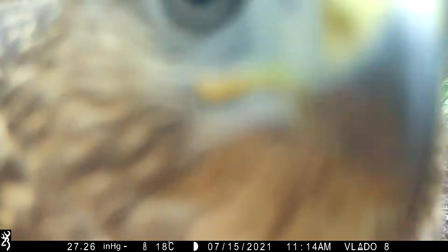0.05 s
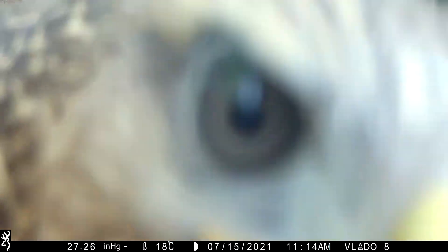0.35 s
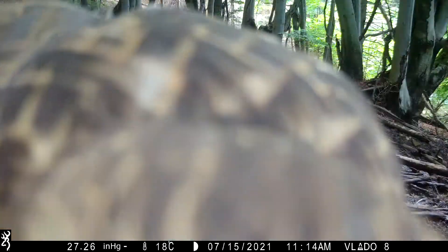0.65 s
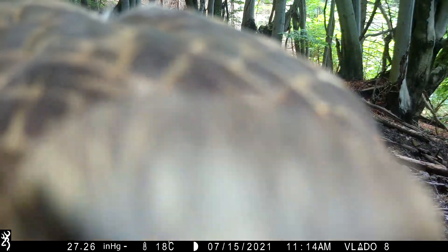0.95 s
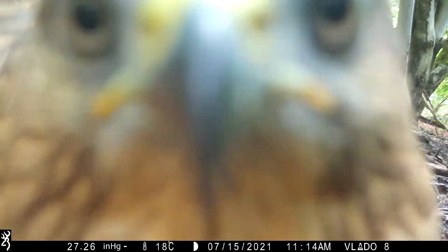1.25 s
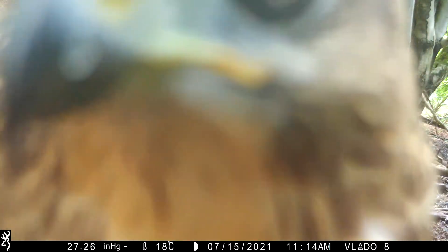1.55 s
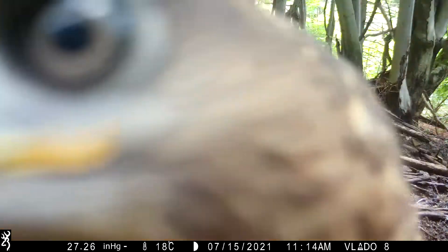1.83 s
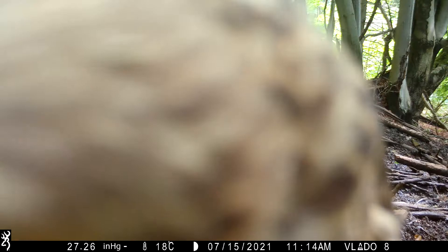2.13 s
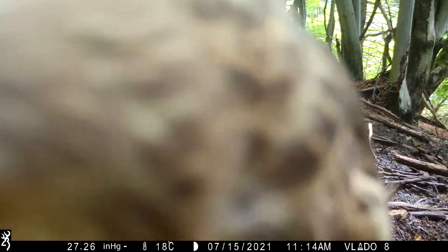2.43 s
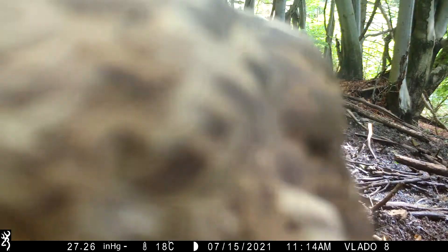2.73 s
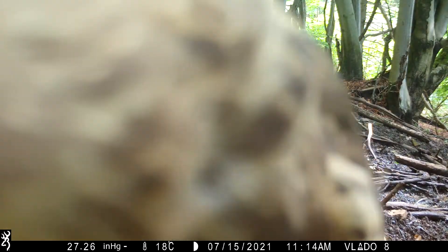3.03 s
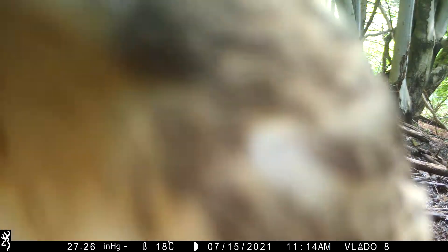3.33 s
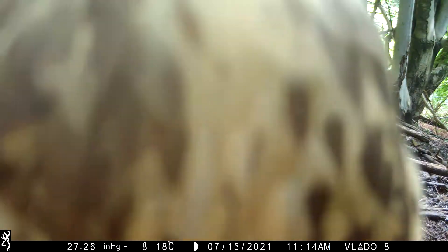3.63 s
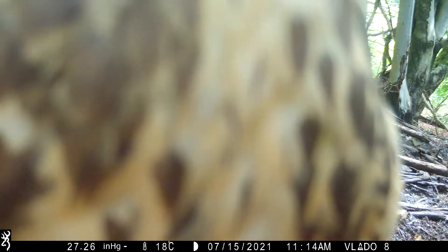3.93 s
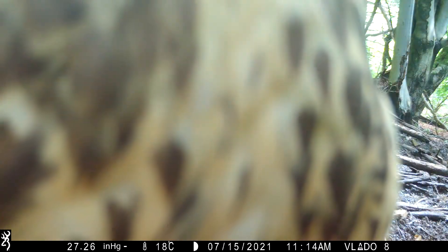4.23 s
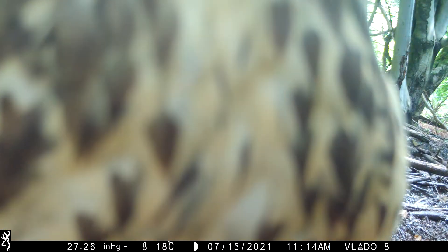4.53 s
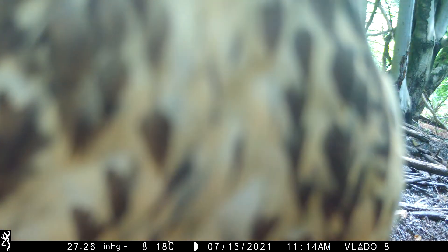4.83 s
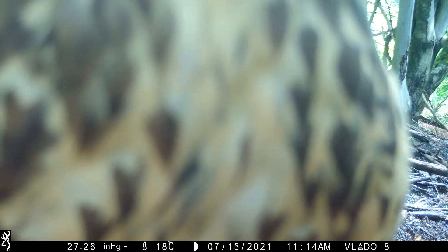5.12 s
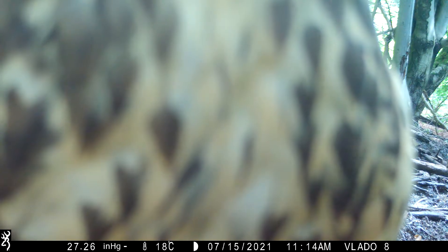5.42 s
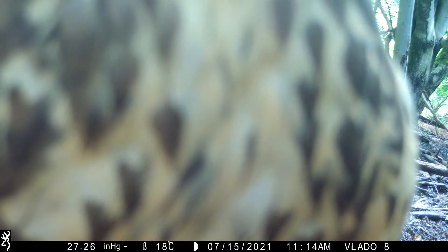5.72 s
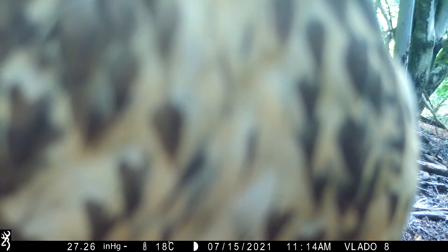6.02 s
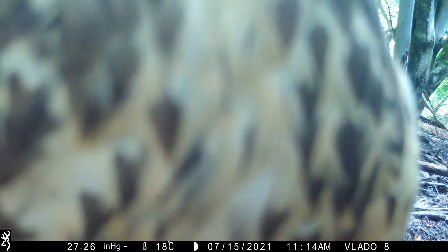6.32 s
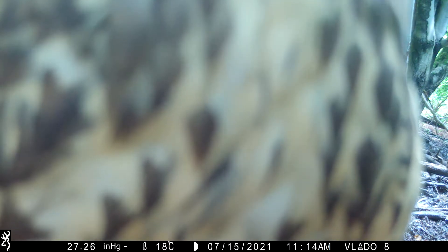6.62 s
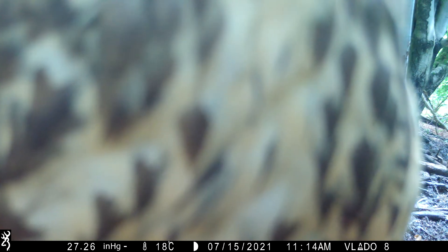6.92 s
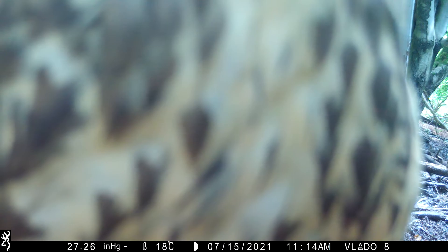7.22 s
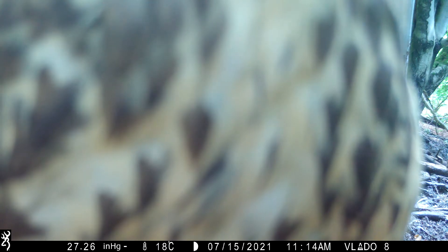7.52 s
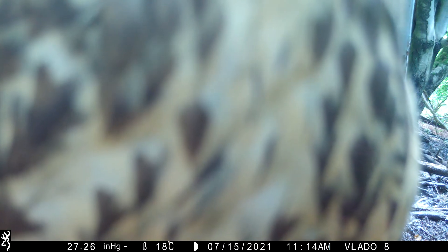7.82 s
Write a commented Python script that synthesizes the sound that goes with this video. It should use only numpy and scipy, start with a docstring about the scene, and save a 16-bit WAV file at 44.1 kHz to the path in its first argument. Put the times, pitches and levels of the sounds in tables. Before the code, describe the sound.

A bird of prey pecks at a trail camera in a quiet wood, heard through the camera's own microphone. A few sharp, very close knocks ring the plastic case just before one second. After a pause comes a busier second of taps and short beak scrapes, the hardest with a dry crackle and a slight thump. From about three seconds on, only a soft, dull hiss remains.

```python
"""Bird of prey at a trail camera

A quiet wood, heard from the camera's own microphone. The bird pecks, then knocks and drags its beak
over the case. Every contact rings the plastic housing right at the microphone; the hardest ones shove
the camera on its mount. A faint whistle sounds far off, behind the camera's hiss and thin whine."""
import sys
import numpy as np
from scipy import signal
from scipy.fft import rfft, irfft, next_fast_len
from scipy.io import wavfile

SR = 44100
rng = np.random.default_rng(int(sys.argv[2]) if len(sys.argv) > 2 else 0)


def generate_wav(signal):
    """Clip the signal to [-1, 1] and save it as 16-bit WAV at the path in sys.argv[1]."""
    frames = np.transpose(np.atleast_2d(signal))
    scaled = np.clip(frames, -1, 1) * 32767
    pcm = np.round(scaled).astype(np.int16)
    wavfile.write(sys.argv[1], SR, pcm)


N = 351036

# Pecks on the case, right at the microphone. Each row: start in seconds, level, brightness, body
# and crackle in relative dB, delay of the rebound in seconds (0 for none).
PECKS = [(.7089, -11.5, -8, 3, -29.5, 0), (.752, -35, -5, 11, -28, 0.00071),
         (.7653, -7.5, -1.5, -2.5, -12.5, .0036), (2.1207, -9, 1, -4, -19.5, 0.0088),
         (2.1789, -10.5, -1.5, 6.5, -18.5, 0), (2.1921, -15, 4.5, -6.5, -31, 0.00033),
         (2.21, -17, 5.5, -7, -19, 0.00027), (2.2568, -42, -4.5, -4, -32, 0.00039),
         (2.539, -38, 5, -7, -36, 0.00035), (2.5775, -38, -7, -7, -38, 0), (2.6081, -33.5, -5, 9, -45, 0),
         (2.651, -18.5, -5, -13, -54.5, 0.0021), (2.7088, -25.5, -5.5, 3.5, -41, 0.0013),
         (2.715, -23, 0, 15, -45, 0.002), (2.732, -6.5, -1.5, 4, -14.5, .0222),
         (2.8421, -36.5, 20, -8, -47, 0.003), (2.8703, -28.5, -5, -17, -42, 0),
         (3.0351, -26, -3, 0, -37, 0.015), (3.264, -48, -3, -8, -22, 0)]
# Bright, dry crackle on the hardest pecks, like a recorder overloading.
# Each row: frequency in Hz, gain in dB.
CRACKLE_SPECTRUM = [(1000, 15), (6500, -1), (9500, 0.5), (12000, -3.5), (15000, -14)]
def pecks(level_db=1, crackle_t60_s=0.011, rebound_db=2, rebound_loss_db_per_s=619.5):
    """Each peck rings the case and some rebound, duller; hard ones crackle like an overload."""
    ring, crackle, t = np.zeros(N), np.zeros(N), clock(.02)
    flat_side, tip = (1340, 5), (3520, 3)  # pitch each part of the beak favours in Hz, boost in dB
    for start, db, bright_db, body_db, crackle_db, rebound_s in PECKS:
        focus_hz, focus_db = flat_side if bright_db < -4.5 else tip
        add(ring, start, blow(db + level_db, bright_db, body_db, focus_hz, focus_db))
        burst = rng.standard_normal(len(t)) * 10 ** (-3 * t / crackle_t60_s)
        add(crackle, start, amp(db + crackle_db) * burst)
        if rebound_s > 0:
            landing_db = db + rebound_db - rebound_loss_db_per_s * rebound_s
            rebound = blow(landing_db, bright_db - 3.5, body_db=-2, focus_hz=1555, focus_db=5)
            add(ring, start + rebound_s, rebound)
    return ring, coloured(crackle, CRACKLE_SPECTRUM)


def blow(db, bright_db, body_db, focus_hz, focus_db, chatter=0.048, contact_s=0.0027):
    """One sharp push of the beak, with a moment of chatter, rings the case."""
    t = clock(.02)
    force = chatter * rng.standard_normal(len(t)) * np.exp(-t / contact_s)
    force[0] += 1
    knock = signal.fftconvolve(force, housing(bright_db, body_db, focus_hz, focus_db))
    attack = knock[:int(.004 * SR)]
    return amp(db) * knock / rms(attack)


# Modes of the plastic around the microphone. Each row: frequency in Hz, level in dB,
# seconds to fall by 60 dB.
HOUSING_MODES = [(190, -35, 0.1), (259.5, -18, 0.063), (337, -19, 0.037), (542, -16, 0.032),
                 (780, -9.5, 0.023), (940, -5, 0.018), (1328, -4.5, 0.032), (1545, 4, 0.013),
                 (1888, -4.5, 0.015), (2060, 1.5, 0.011), (2423, -5.5, 0.013), (2700, -1, 0.0084),
                 (3376, -1, 0.018), (3470, -2.5, 0.017), (3684, -4, 0.0195), (4110, -10.5, .012),
                 (4120, -7.5, 0.0066), (4410, -20, 0.02)]
def housing(bright_db, body_db, focus_hz, focus_db, focus_octaves=0.057, scatter_db=1.5, detune=0.012):
    """The case rings: the beak's tip favours high modes, its flat side low ones; no two hits match."""
    t = clock(.06)
    hz, db, t60 = np.transpose(HOUSING_MODES)
    gain, pitch, phase = rng.standard_normal((3, len(hz)))
    tilt_db = along([(600, body_db), (1200, 0.0042), (1500, 0.0046), (3300, bright_db)], hz)
    # The spot touched weights the modes near one pitch.
    spot_db = focus_db * np.exp(-(np.log2(hz / focus_hz) / focus_octaves) ** 2 / 2)
    cycles = np.outer(hz * (1 + detune * pitch), t)
    fade = 10 ** (-3 * np.outer(1 / t60, t))
    modes = fade * np.sin(2 * np.pi * cycles + 0.95 * phase[:, None])
    return amp(db + tilt_db + spot_db + scatter_db * gain) @ modes


# The beak dragged over the case, just as close. Each row: start and length in seconds, then level,
# brightness and body in relative dB.
BEAK_STROKES = [(0.77, .011, -12.5, -3, -12), (2.121, 0.031, -27.5, -3.5, 5), (2.16, .032, -24, 9, 5),
                (2.186, 0.018, -23.5, -2, 7), (2.521, 0.047, -38.5, 4, -16), (2.555, 0.065, -40, -2, -2),
                (2.625, 0.043, -35.5, -1, -12), (2.681, 0.021, -32.5, 6, 4), (2.733, 0.026, -24, 0, 10),
                (2.759, 0.019, -17.5, 3.5, 5), (2.779, 0.044, -38.5, -3, 6), (2.863, 0.036, -28, -1, -28),
                (2.89, 0.1, -46.5, 5, -21), (3.027, 0.033, -24, 2, 13), (3.058, 0.036, -44.5, 6, 5)]
# Treble of the grit under a stroke. Each row: frequency in Hz, gain in dB.
GRIT_SPECTRUM = [(1000, -5), (7000, -11), (9300, 3), (11500, -11), (15000, -10.5)]
def scrapes(slips_per_s=2000, spread_db=4.5, body_lift_db=5, grit_db=-30):
    """The beak sticks and slips on textured plastic: uneven jolts ring the case, the largest click."""
    ring, grit = np.zeros(N), np.zeros(N)
    for start, length_s, db, bright_db, body_db in BEAK_STROKES:
        pressure = stroke_pressure(length_s)
        slipping = rng.random(SR) < slips_per_s / SR
        direction = rng.choice([-1, 1], SR)
        jolt = amp(spread_db * rng.standard_normal(SR))
        slips = (slipping * direction * jolt)[:len(pressure)]
        force = pressure * slips
        clicks = force * np.abs(slips)
        response = housing(bright_db, body_db + body_lift_db, focus_hz=3420, focus_db=-2)
        rasp = signal.fftconvolve(force, response)
        strength = amp(db) * np.linalg.norm(pressure)
        add(ring, start, strength * rasp / (np.linalg.norm(rasp) + 1e-9))
        add(grit, start, strength * amp(grit_db) * clicks / (np.linalg.norm(clicks) + 1e-9))
    return ring, coloured(grit, GRIT_SPECTRUM)


def stroke_pressure(length_s, swell_share=.4, depth_db=11, lift_s=0.00424):
    """Pressure through one stroke: it swells to 1, eases off, and the beak lifts."""
    t = clock(2 * length_s)
    rise_s = length_s * swell_share
    from_peak = np.maximum(1 - t / rise_s, (t - rise_s) / (length_s - rise_s))
    lift = np.exp(-np.maximum(t - length_s, 0) / lift_s)
    return amp(-depth_db * from_peak) * lift


# Blows that move the whole camera, microphone and all. Each row: time in seconds, push in dB,
# sway frequency in Hz, sway level in dB.
CAMERA_SHOVES = [(0.71, -41, 123, -49), (0.769, -27.5, 128, -44), (2.180, -30.5, 50, -55),
                 (2.731, -27, 47.7, -61), (3.04, -58, 45.4, -70)]
def shoves(push_s=0.0018, lead_s=.008, sway_cycles=36):
    """A hard blow gives one low push, then the camera sways on its mount for some dozens of cycles."""
    thumps, t = np.zeros(N), clock(.8)
    from_peak = (t - lead_s) / push_s
    push = (from_peak ** 2 / 2 - 1) * np.exp(-from_peak ** 2 / 2)
    for start, push_db, sway_hz, sway_db in CAMERA_SHOVES:
        fade = 10 ** (-3 * t * sway_hz / sway_cycles)
        add(thumps, start - lead_s, amp(push_db) * push)
        add(thumps, start, amp(sway_db) * np.sin(2 * np.pi * sway_hz * t) * fade)
    return thumps


# How the built-in microphone hears knocks through the case. Each row: frequency in Hz, gain in dB.
MICROPHONE_RESPONSE = [(30, -19.5), (120, -24), (210, -6), (4400, 2), (4900, -7), (5500, -14.5),
                       (6200, -25), (8000, -34), (15000, -29)]
def microphone(ring, ceiling=0.54, knee=4):
    """At such close range the microphone rounds off the hardest knocks; it favours the midrange."""
    rounded = ring / (1 + np.abs(ring / ceiling) ** knee) ** (1 / knee)
    return coloured(rounded, MICROPHONE_RESPONSE)


def whistle(centre_hz=3650, width_hz=45, length_s=0.42, level_db=-66.5):
    """A faint whistle far from the camera, blurred by the wood, fades away at the start."""
    tone = filtered(rng.standard_normal(N), lambda hz: np.exp(-((hz - centre_hz) / width_hz) ** 2 / 2))
    fade = np.clip(1 - np.arange(N) / SR / length_s, 0, 1)
    return amp(level_db) * fade * tone / rms(tone)


# The camera's own noise floor. Each row: frequency in Hz, relative density in dB.
HISS_SPECTRUM = [(15, -63), (25, -30.5), (107, -19.5), (183, -15), (240, -11.5), (359, -6.5), (399, -6),
                 (722, -2), (1170, -1), (2420, -6), (4040, -19), (6730, -41), (7910, -45), (8580, -45),
                 (15500, -44.5)]
def hiss(level_db=-50.5):
    """Even, dull hiss of the microphone's amplifier."""
    noise = filtered(rng.standard_normal(N), lambda hz: amp(along(HISS_SPECTRUM, hz)))
    return amp(level_db) * noise / rms(noise)


def whine(tone_hz=7796, flips_per_s=59.55, level_db=-86.5):
    """A thin electronic whine that keeps flipping its phase."""
    t = np.arange(N) / SR
    polarity = np.sign(np.sin(np.pi * flips_per_s * t))
    return amp(level_db) * np.sqrt(2) * polarity * np.sin(2 * np.pi * tone_hz * t)


def amp(db):
    """Decibels to gain."""
    return 10 ** (np.asarray(db) / 20)


def rms(x):
    """Root mean square."""
    return np.sqrt(np.mean(x ** 2) + 1e-20)


def along(points, hz):
    """(Hz, value) points read on a log axis."""
    point_hz, values = np.transpose(points)
    return np.interp(np.log(hz + 1), np.log(point_hz + 1), values)


def clock(seconds):
    """Sample times of a stretch."""
    return np.arange(int(seconds * SR)) / SR


def add(track, start_s, sound):
    """Mix a sound into a track."""
    track[round(start_s * SR):][:len(sound)] += sound


def filtered(x, gain):
    """Apply a gain that depends on frequency."""
    size = next_fast_len(N + SR // 4)
    return irfft(rfft(x, size) * gain(np.fft.rfftfreq(size, 1 / SR)), size)[:N]


def coloured(x, points, size=4096):
    """Causal filter through (Hz, dB) points, which keeps attacks sharp."""
    gain = amp(along(points, np.fft.rfftfreq(size, 1 / SR)))
    cepstrum = irfft(np.log(gain))
    cepstrum[1:size // 2] *= 2  # fold onto positive time for minimum phase
    cepstrum[size // 2 + 1:] = 0
    response = irfft(np.exp(rfft(cepstrum)))
    return signal.fftconvolve(x, response)[:N]


def scene():
    """The beak reaches the microphone through the case, over a far whistle and the steady floor."""
    knocks, crackle = pecks()
    rasps, grit = scrapes()
    case = microphone(knocks + rasps)
    return (case + crackle + grit + shoves() + whistle() + hiss() + whine())[None]


def record(dry, top_hz=15800):
    """The camera's single channel keeps nothing above its band limit."""
    return filtered(dry[0], lambda hz: hz < top_hz)[None]


dry = scene()
out = record(dry)
generate_wav(out)
```